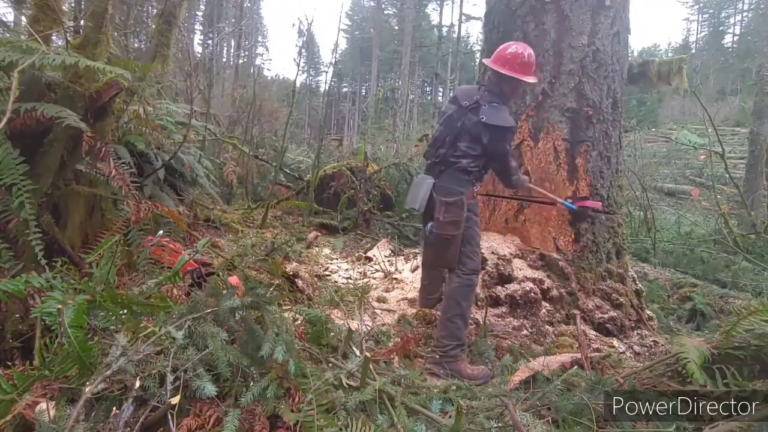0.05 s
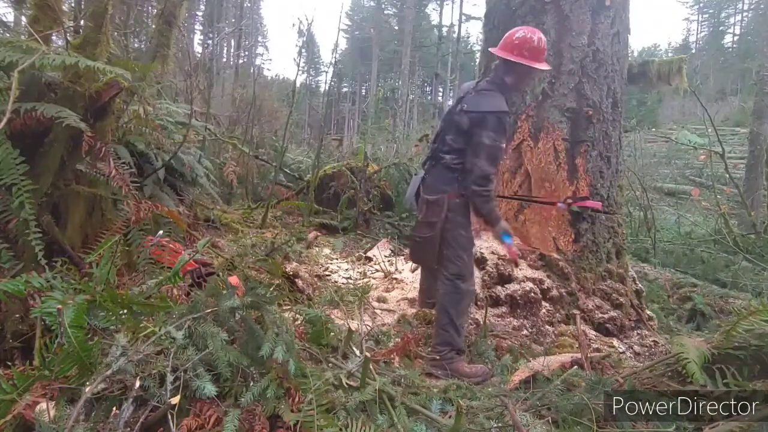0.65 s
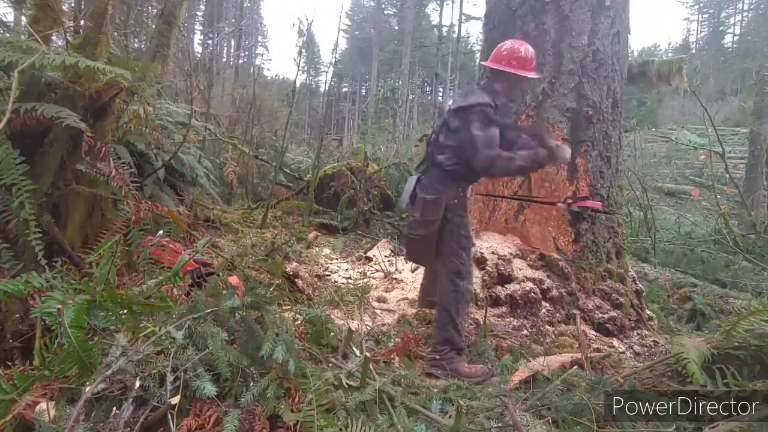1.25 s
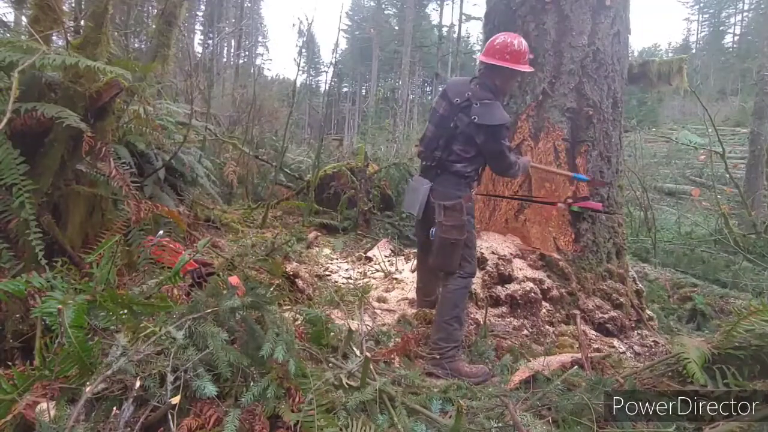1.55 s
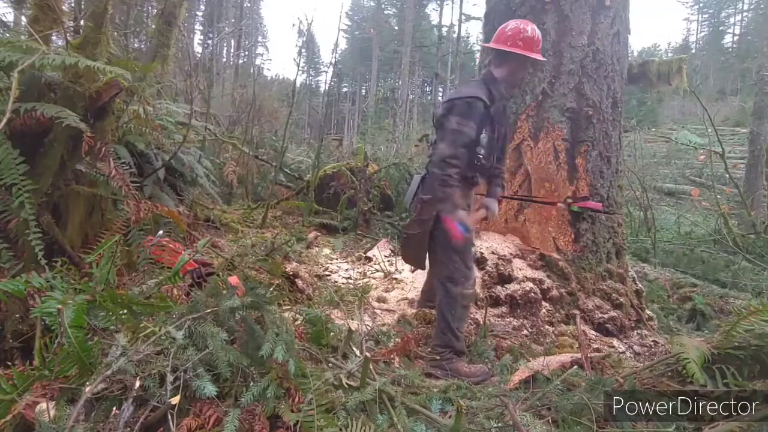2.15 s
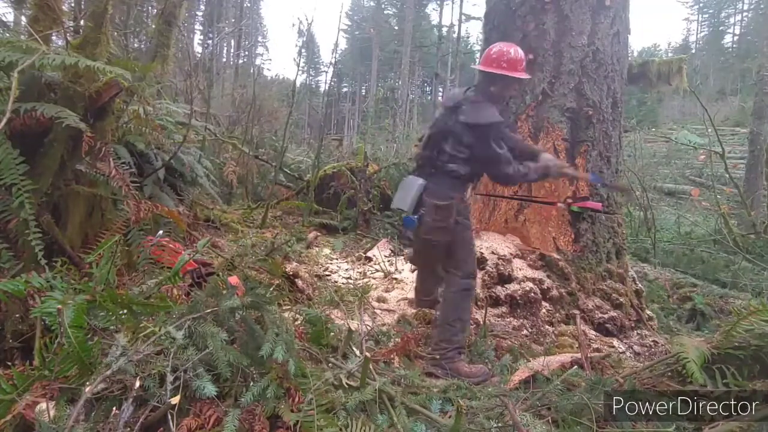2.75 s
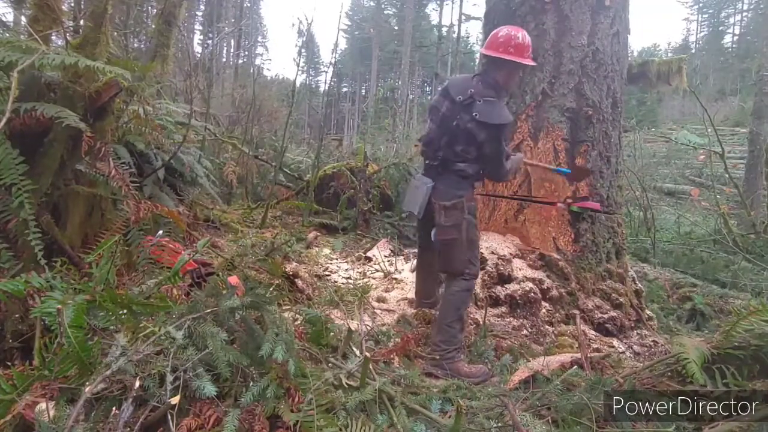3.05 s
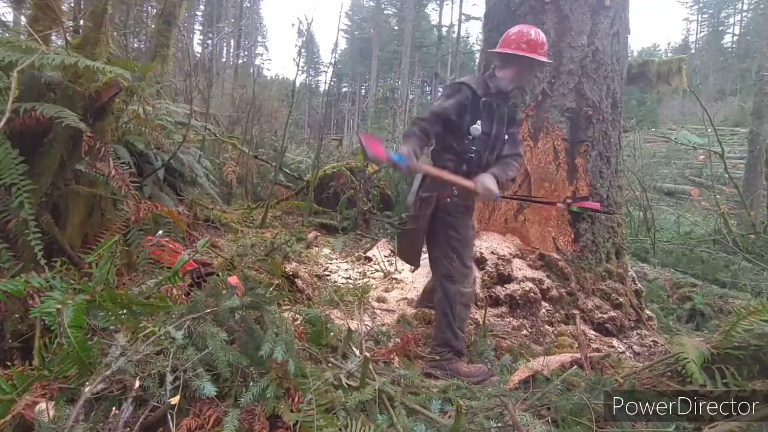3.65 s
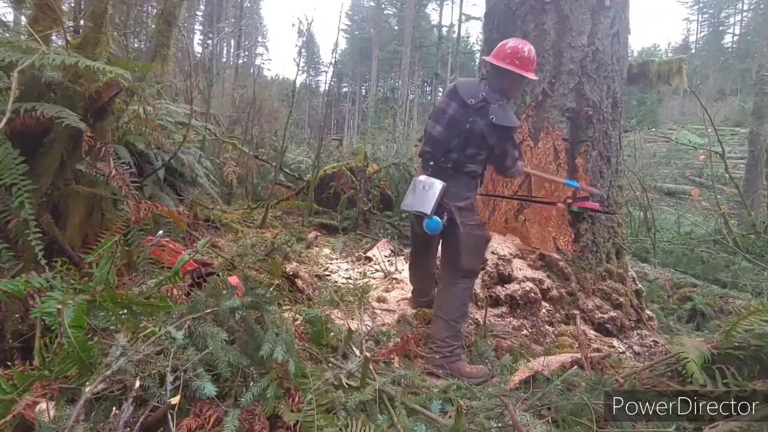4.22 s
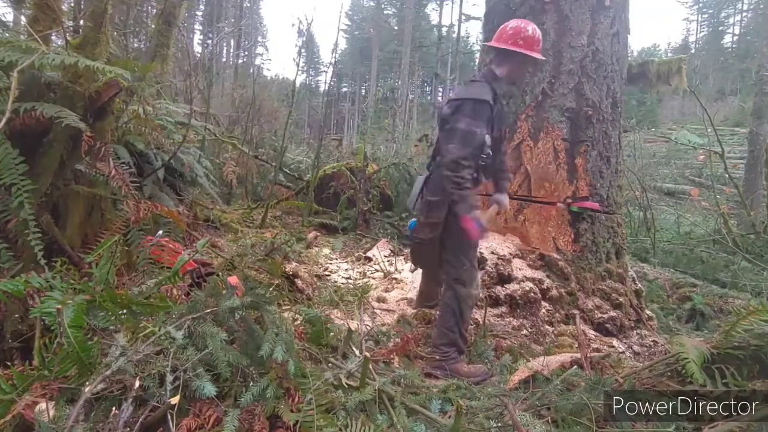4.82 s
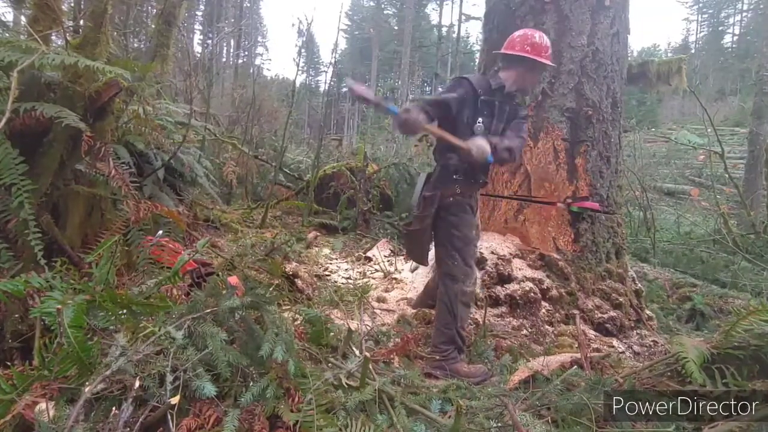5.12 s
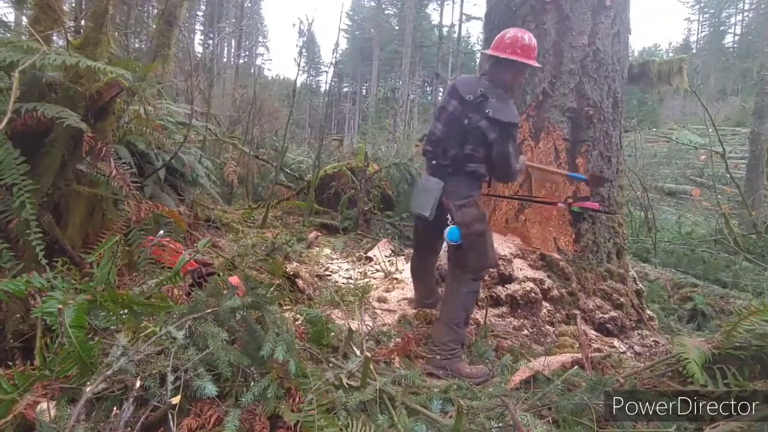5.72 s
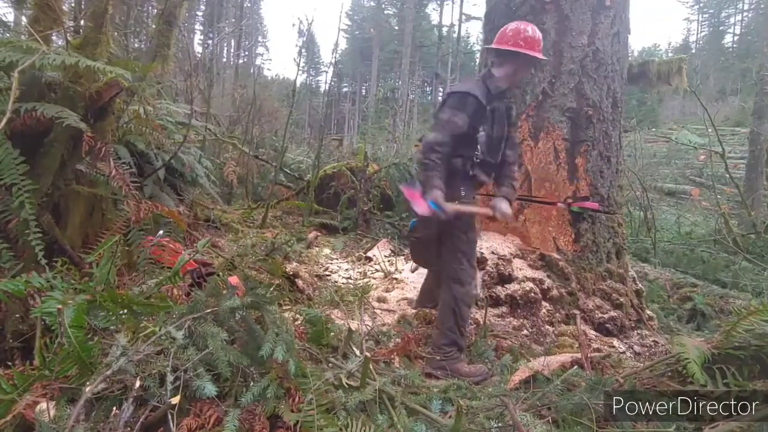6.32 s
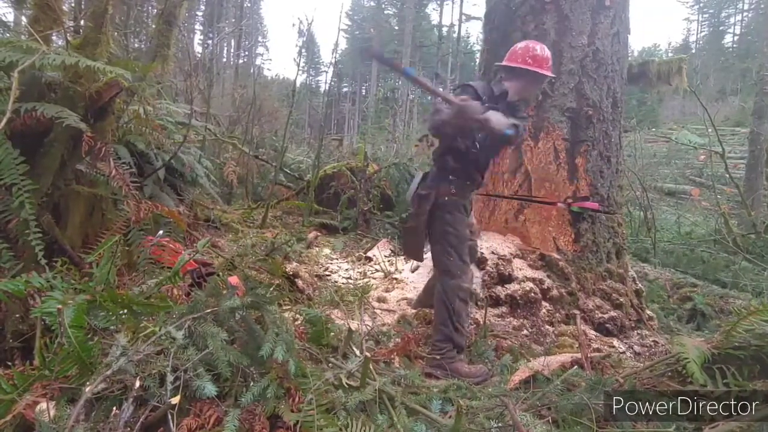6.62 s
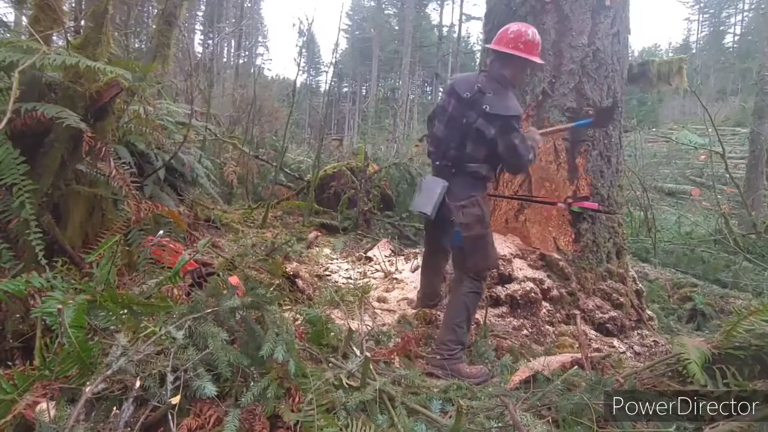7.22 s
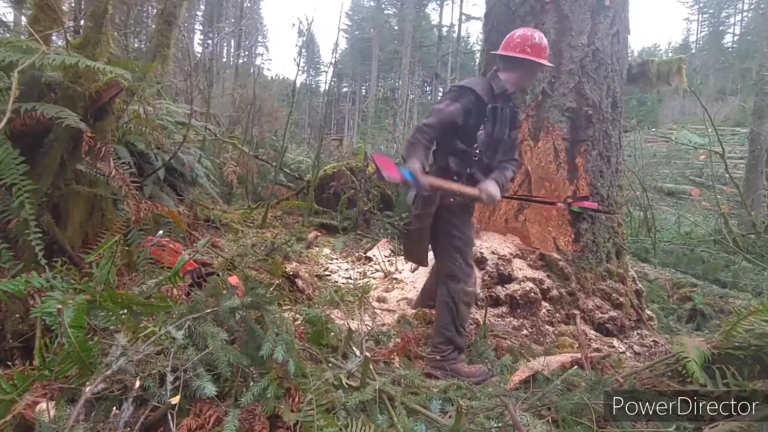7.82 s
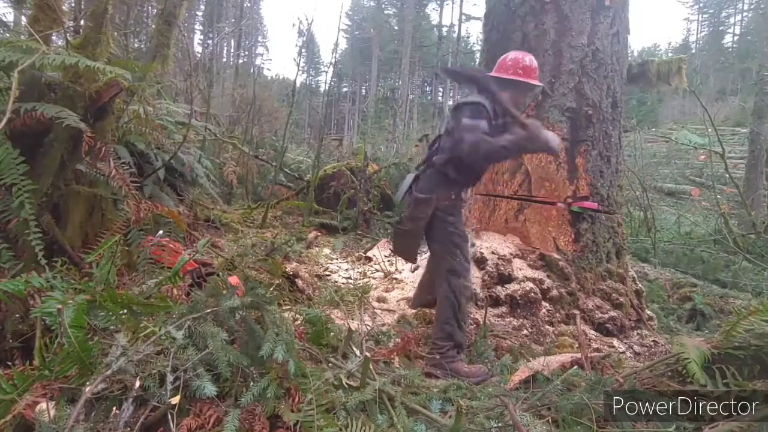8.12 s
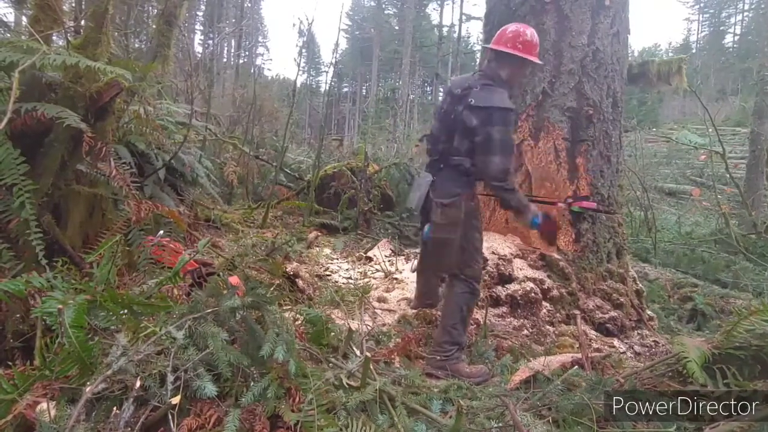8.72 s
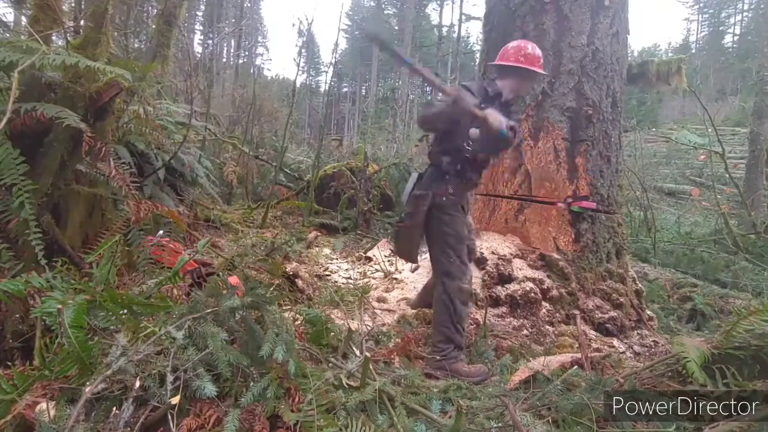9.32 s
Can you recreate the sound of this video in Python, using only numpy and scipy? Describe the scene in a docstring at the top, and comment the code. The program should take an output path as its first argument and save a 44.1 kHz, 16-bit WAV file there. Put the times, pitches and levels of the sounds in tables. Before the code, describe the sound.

An axe drives felling wedges into a big tree in quiet woods, heard from nearby and slightly to the right. A lighter, duller blow lands at 0.2 seconds, followed by six hard ones at about 1.6, 3.0, 4.3, 5.7, 7.0 and 8.4 seconds. Each is a sharp crack with a short ring and a forest echo lasting about a second. The trunk thuds and booms more deeply as the blows go on.

Between strikes, a buckle clinks softly and clothing rustles faintly. A hollow tin on the belt clanks just before the blows, most clearly around 2.9, 4.2, 7.0 and 8.4 seconds. Soft hollow knocks of strained wood follow the strikes. There is a small snap at 1.7 seconds, then loud, sharp wood cracks at 7.4 and 8.6, with smaller ones at 7.8 and 9.1. Underneath lies a very faint hush with tiny twig ticks.

```python
"""An axe drives felling wedges into a big fir: one light blow, then six hard ones. Each jerks the wedge
into the cut and rings wedge and stem; the tighter the wedge, the more the tree booms and the forest echoes.
The hinge wood starts to crack. Belt gear clinks on the backswing and knocks on the downswing; twigs tick
in the hush of the woods. The left microphone port rings near 7 kHz; a limiter ducks on the hard blows,
then lets the echo swell."""
import sys
import numpy as np
from scipy import signal
from scipy.fft import rfft, irfft, next_fast_len
from scipy.io import wavfile
from scipy.ndimage import map_coordinates

SR = 44100
rng = np.random.default_rng(int(sys.argv[2]) if len(sys.argv) > 2 else 0)


def generate_wav(signal):
    """Clip the signal to [-1, 1] and save it as 16-bit WAV at the path in sys.argv[1]."""
    frames = np.transpose(np.atleast_2d(signal))
    scaled = np.clip(frames, -1, 1) * 32767
    pcm = np.round(scaled).astype(np.int16)
    wavfile.write(sys.argv[1], SR, pcm)


N = 413216


def amp(db):
    return 10 ** (np.asarray(db) / 20)


def along(points, hz):
    """Interpolate (f/Hz, value) points over log frequency."""
    f, value = np.transpose(points)
    return np.interp(np.log(hz + 1), np.log(f), value)


def seconds(length_s):
    return np.arange(int(length_s * SR)) / SR


def fade(t, t60_s):
    return np.exp(-np.log(1000) * t / max(t60_s, 1e-4))


def onset(t, rise_s):
    return 1 - np.exp(-t / rise_s)


def fade_after(t, delay_s, t60_s):
    return (t >= delay_s) * fade(np.abs(t - delay_s), t60_s)


def ring(t, hz, t60_s):
    return np.sin(2 * np.pi * hz * t) * fade(t, t60_s)


def wander(t, rate_hz, points):
    """Smooth random curve."""
    return map_coordinates(rng.standard_normal(points), [t * rate_hz], mode="mirror")


def add(track, at_s, sound):
    start = max(round(at_s * SR), 0)
    track[:, start:start + sound.shape[-1]] += sound[..., :N - start]


def unit_rms(x):
    return x / np.sqrt(np.mean(x ** 2) + 1e-20)


def noise(spectrum, size, treble_db=0, bass_db=0):
    """Coloured noise of rms 1, then treble and bass tilts."""
    hz = np.fft.rfftfreq(size, 1 / SR)
    coloured = unit_rms(irfft(rfft(rng.standard_normal(size)) * amp(along(spectrum, hz)), size))
    tilt_db = treble_db * along([(1600, 0), (3000, 0.45), (6000, 1.0)], hz)
    tilt_db += bass_db * along([(400, 0.9), (900, 0.38)], hz)
    return irfft(rfft(coloured) * amp(tilt_db), size)


def resonance(hz, width_hz, size):
    """Narrowband noise of rms 1."""
    offset = (np.fft.rfftfreq(size, 1 / SR) - hz) / width_hz
    return unit_rms(irfft(rfft(rng.standard_normal(size)) / (1 + offset ** 2), size))


# Diffuse field: f/Hz, left-right coherence
COHERENCE = [(25, 0.96), (70, 0.89), (130, 0.19), (290, 1), (640, 0.048), (1400, 0.0027)]

def diffuse(spectrum, size):
    """Noise from all sides, alike at both ports only at low frequencies."""
    angle = np.arccos(np.clip(along(COHERENCE, np.fft.rfftfreq(size, 1 / SR)), -1, 1)) / 2
    mid = rfft(noise(spectrum, size)) * np.cos(angle)
    side = rfft(noise(spectrum, size)) * np.sin(angle)
    return irfft([mid + side, mid - side], size)


# Hush spectrum: f/Hz, level/dB
AIR_SPECTRUM = [(20, -5.5), (55, -4.5), (90, 2.5), (130, -9), (185, -4.5), (260, -6), (700, -14.5),
                (2500, -19.5), (4500, -35.5), (8000, -31), (15000, -35.5)]

def still_air(level_db=-70):
    """The slowly drifting hush of the woods."""
    drift_db = wander(np.arange(N) / SR, rate_hz=3, points=40)
    return amp(level_db + drift_db) * diffuse(AIR_SPECTRUM, next_fast_len(N))[:, :N]


# Low hum: f/Hz, width/Hz, level/dB, t60/s
HUM_BAND = (182, 9, -68, 10)

def hum():
    """A faint, wavering hum dies away."""
    hz, width_hz, db, t60_s = HUM_BAND
    return amp(db) * resonance(hz, width_hz, next_fast_len(N))[:N] * fade(np.arange(N) / SR, t60_s)


# Twig and buckle click spectrum: f/Hz, level/dB
CLICK_SPECTRUM = [(2000, -17.5), (4000, 0), (7000, -5.5), (10000, -0.5), (15000, -9)]

def litter(level_db=-72, spread_db=3, t60_s=0.018, count=45):
    """Needles and twigs tick under shifting boots."""
    out, t = np.zeros((2, N)), seconds(0.05)
    for position, softness in rng.uniform(0, 1, (count, 2)):
        db = level_db - spread_db * np.log(softness + 0.03)
        add(out, position * N / SR, amp(db) * diffuse(CLICK_SPECTRUM, len(t)) * fade(t, t60_s))
    return out


# Echo spectrum: f/Hz, level/dB
ECHO_SPECTRUM = [(40, -1), (280, -1), (500, 3.5), (1000, 1), (1800, -0.5), (2600, 3), (3500, 2), (4700, 1),
                 (7500, 11), (10000, 2.5), (15000, 6)]
# Echo decay: f/Hz, t60/s
ECHO_DECAY = [(50, 0.24), (250, 0.88), (600, 0.83), (1100, 0.87), (1800, 0.93), (2600, 0.83), (3400, 0.72),
              (4700, 0.7), (7200, 0.52), (9500, 0.42), (11500, 0.4), (13000, 0.16)]
# Nearest trunks, left channel: delay/s, level/dB re the whole echo
TRUNK_ECHOES = [(.085, -11), (.109, -19), (.165, -25)]

def outdoors(sound, echo_db, near_db=-1):
    """Sound from the right: direct, off nearby ground and stump, then scattered by many trunks."""
    t = seconds(1.2)
    hz, frame_s, frames = signal.stft(diffuse(ECHO_SPECTRUM, len(t)), SR, nperseg=256)
    decay = amp(-60 * frame_s / along(ECHO_DECAY, hz)[:, None])
    far = signal.istft(frames * decay, SR, nperseg=256)[1][:, :len(t)]
    clumps_db = 3 * wander(t, rate_hz=200, points=400)  # trees stand in clumps
    far *= amp(clumps_db) * onset(t, rise_s=0.028)
    far /= np.linalg.norm(far[0])
    for delay_s, db in TRUNK_ECHOES:
        far[0, round(delay_s * SR)] += amp(db)
    near = diffuse(ECHO_SPECTRUM, len(t)) * np.exp(-(t / 0.019) ** 3)
    paths = amp(echo_db) * far * amp([[0], [-3]]) + amp(near_db) * near / np.linalg.norm(near[0])
    paths[0, 7] += 1  # direct path: later and weaker on the left
    paths[1, 0] += amp(5)
    return signal.fftconvolve(sound[None], paths, axes=1)


# Gear ticks: t/s, level/dB
GEAR_TICKS = [(0.486, -72), (2.624, -70.5), (3.675, -65.5), (4.096, -69), (4.986, -57), (5.467, -59),
              (6.921, -60), (8.119, -62.5), (8.311, -57.5), (9.127, -56.5)]
# Tick spectrum: f/Hz, level/dB
TICK_SPECTRUM = [(1500, -24.5), (5000, -17), (6500, 0), (8200, 6.5), (10000, -13.5), (15000, -12)]

def gear_ticks(t60_s=0.041):
    """Light gear ticks between swings."""
    out, t = np.zeros((2, N)), seconds(0.1)
    for at_s, db in GEAR_TICKS:
        tick = noise(TICK_SPECTRUM, len(t)) * fade(t, t60_s)
        add(out, at_s, amp(db) * outdoors(tick, echo_db=-13.5, near_db=-6.5))
    return out


# Shaken cloth and gear: t/s, length/s, start level/dB, end level/dB
GEAR_SHAKES = [(0.504, 0.021, -63, -64), (1.496, .04, -57.5, -57.5), (2.408, 0.17, -59.5, -61),
               (2.808, 0.13, -55, -47), (3.755, 0.12, -59.5, -55), (4.177, 0.036, -60.5, -49.5),
               (4.265, 0.022, -37, -31), (5.155, 0.17, -56.5, -57), (5.496, 0.24, -61, -60),
               (6.529, .13, -56, -60.5), (6.961, 0.032, -62.5, -44.5), (7.955, .12, -49, -51.5),
               (8.304, 0.079, -61, -47)]

def gear_shakes(touch_rate_hz=90, cloth_db=-11, jingle_db=-14, jingle_hz=9900, pieces=4):
    """A swing rustles cloth; small pieces of gear touch at random and jingle."""
    out, t = np.zeros((2, N)), seconds(0.05)
    for at_s, length_s, start_db, end_db in GEAR_SHAKES:
        size = int(length_s * SR)
        touches = (rng.random(size) < touch_rate_hz / SR) * amp(rng.normal(0, 4, size))
        touches[0] = 1
        swell = amp(np.linspace(start_db, end_db, size))
        contacts = signal.fftconvolve(touches, fade(t, t60_s=0.037))
        cloth = amp(cloth_db) * np.sqrt(np.hanning(len(contacts)))
        envelope = (unit_rms(contacts) + cloth) * np.pad(swell, (0, len(t) - 1), mode="edge")
        rattle = noise(TIN_SPECTRUM, SR // 2, treble_db=-15, bass_db=-10)[:len(envelope)] * envelope
        struck = rng.integers(pieces, size=size)
        rings = [ring(t, jingle_hz * rng.normal(1, 0.065), t60_s=0.049) for _ in range(pieces)]
        jingle = sum(signal.fftconvolve(touches * swell * (struck == k), rings[k]) for k in range(pieces))
        add(out, at_s, outdoors(rattle + amp(jingle_db) * jingle, echo_db=-13, near_db=-6.5))
    return out


# Buckle on hook: t/s, knock level/dB, steel level/dB, glint f/Hz, glint t60/s
BUCKLE_HITS = [(2.441, -41, -47.5, 9400, 0.087), (2.522, -47.5, -52.5, 9750, 0.055),
               (3.779, -49, -56, 9100, 0.058), (3.8535, -45, -61.5, 9200, 0.11),
               (5.176, -49, -55, 10400, 0.067), (5.2542, -44, -66.5, 10300, 0.079),
               (5.278, -45, -58.5, 3166, 0.093), (6.539, -46, -43.5, 9400, 0.071),
               (6.6244, -47.5, -57, 9800, 0.11), (7.9602, -40.5, -41.5, 9350, 0.073),
               (8.0385, -44.5, -49.5, 9250, 0.097)]
# Steel hook: f/Hz, level/dB, t60/s
HOOK_MODES = [(3200, -14, 0.074), (6050, -22, 0.08), (10400, -10.5, 0.082), (11600, -19, 0.041)]

def buckle_clinks(clack_hz=(700, 1050, 1650, 2550, 3700), bounce_span_s=0.011, bounces=2):
    """The buckle clacks, bounces and rings the belt's hook."""
    out, t = np.zeros((2, N)), seconds(0.12)
    for at_s, knock_db, steel_db, glint_hz, glint_t60_s in BUCKLE_HITS:
        hook = sum(amp(db + rng.normal(0, 2.7)) * ring(t, hz, t60_s) for hz, db, t60_s in HOOK_MODES)
        glint = resonance(glint_hz, width_hz=170, size=len(t)) * fade(t, glint_t60_s)
        click = amp(-7) * noise(CLICK_SPECTRUM, len(t)) * fade(t, t60_s=0.029)
        steel = (glint + hook) * onset(t, rise_s=0.003) + click
        clack = sum(amp(-4 - 1.5 * k) * ring(t, hz * rng.normal(1, 0.14), t60_s=0.045)
                    for k, hz in enumerate(clack_hz))
        bump = noise(TIN_SPECTRUM, len(t), treble_db=-15.5, bass_db=-4) * fade(t, t60_s=0.025)
        contacts = np.r_[1.0, np.zeros(len(t))]
        bounce_samples = (rng.uniform(0.2, 1, bounces) * bounce_span_s * SR).astype(int)
        contacts[bounce_samples] += amp(-7) * rng.standard_normal(bounces)
        hit = signal.fftconvolve(amp(steel_db) * steel + amp(knock_db) * (bump + clack), contacts)
        add(out, at_s, outdoors(hit, echo_db=-17, near_db=-8))
    return out


# Belt tin on the hip: t/s, level/dB, treble/dB, note f/Hz, note level/dB
TIN_HITS = [(0.5225, -34, -10, 760, -3), (1.5055, -33, -3, 800, -2), (5.575, -29, 3.5, 1280, -2),
            (8.376, -28, -8, 805, 2), (2.86, -33, 0.5, 840, 0), (2.903, -10.5, -1.5, 1240, 2),
            (4.22, -14, -4, 835, 3), (5.522, -39, -2, 1316, 0), (5.644, -23, 7.5, 601, 0),
            (6.991, -11.5, -2, 743, 0), (7.0235, -13, -0.5, 586, 0), (8.394, -34.5, 14, 776, -6),
            (8.413, -23, 11.5, 550, -3), (8.4235, -9.5, 1.5, 606, 0)]
# Edge contact, then flat: delay/s, level/dB, treble/dB, note level/dB
TIN_LANDING = [(0, 3, -1, -10), (.006, -5.5, -8.5, -0.5)]
# Rattle spectrum: f/Hz, level/dB
TIN_SPECTRUM = [(60, -19), (300, -11), (600, 1.5), (1400, -7), (3000, -2.5), (5000, -12), (9000, -6.5),
                (12000, -14.5), (15000, -36.5)]
# Hollow tin: f/note, level/dB, t60/s
HOLLOW_MODES = [(1, -1, 0.088), (1.16, -9.5, 0.045), (1.869, -7, 0.064), (2.949, -9.5, .05),
                (4.049, -13, 0.054), (4.699, -11, 0.045)]

def tin_knocks(level_db=-9, rattle_t60_s=0.11, hiss_t60_s=0.022):
    """The tin lands with a hiss and a rattle, and rings hollow."""
    out, t = np.zeros((2, N)), seconds(0.2)
    for at_s, db, bright_db, note_hz, hollow_db in TIN_HITS:
        hit = np.zeros(len(t))
        for delay_s, touch_db, treble_db, note_db in TIN_LANDING:
            rattle = noise(TIN_SPECTRUM, len(t), bright_db + treble_db - 5, bass_db=-4.5)
            rattle *= amp(-2.5) * fade_after(t, delay_s, rattle_t60_s)
            hiss = noise(TIN_SPECTRUM, len(t), bright_db + treble_db, bass_db=-8)
            hiss *= amp(-0.5) * fade_after(t, delay_s, hiss_t60_s)
            phase = 2 * np.pi * note_hz * t
            hollow = sum(amp(mode_db) * np.sin(ratio * phase) * fade_after(t, delay_s, t60_s)
                         for ratio, mode_db, t60_s in HOLLOW_MODES)
            hit += amp(touch_db) * (rattle + hiss + amp(note_db + hollow_db) * hollow)
        add(out, at_s, amp(db + level_db) * outdoors(hit, echo_db=-3.5, near_db=-5.5))
    return out


# Wood giving way: t/s, level/dB, f/Hz
WOOD_SLIPS = [(0.244, -28, 620), (1.644, -30, 670), (1.735, -31, 705), (3.078, -27, 433),
              (3.158, -33.5, 790), (3.495, -51.5, 456), (4.464, -27.5, 430), (4.572, -36, 470),
              (5.657, -26, 560), (7.388, -18.5, 436), (8.574, -20, 385)]

def wood_slips(width_hz=90, t60_s=0.078, rise_s=0.0019):
    """Strained wood slips in the cut with a hollow knock."""
    out, t = np.zeros((2, N)), seconds(0.2)
    for at_s, db, hz in WOOD_SLIPS:
        knock = resonance(hz, width_hz, len(t)) * fade(t, t60_s) * onset(t, rise_s)
        add(out, at_s, amp(db) * outdoors(knock, echo_db=-17, near_db=-10))
    return out


# Fibre snaps: t/s, level/dB, treble/dB
FIBRE_SNAPS = [(1.735, -20, -4), (3.792, -31.5, 1.5), (6.744, -38.5, 1), (7.389, 4, -9), (7.82, -9.5, -18),
               (8.569, 1.5, -7.5), (9.0702, -21.5, 2.5)]
# Snap spectrum: f/Hz, level/dB
FIBRE_SPECTRUM = [(40, -4), (200, -2.5), (450, -0.5), (1000, -8), (2000, 2.5), (3500, -0.5), (7000, -5),
                  (11000, -7), (15000, -28.5)]
# Hinge wood: f/Hz, level/dB, t60/s
HINGE_MODES = [(880, -19, .04), (1500, -22.5, 0.031), (2070, -16.5, .025)]

def hinge_cracks(level_db=-5, snap_t60_s=0.0041, splinter_db=-17, splinter_t60_s=0.14):
    """Fibres snap and ring the hinge wood, with a tail of splintering."""
    out, t = np.zeros((2, N)), seconds(0.2)
    envelope = fade(t, snap_t60_s) + amp(splinter_db) * fade(t, splinter_t60_s)
    for at_s, snap_db, treble_db in FIBRE_SNAPS:
        snap = noise(FIBRE_SPECTRUM, len(t), treble_db) * envelope
        wood = sum(amp(db) * ring(t, hz * rng.normal(1, 0.03), t60_s) for hz, db, t60_s in HINGE_MODES)
        add(out, at_s, amp(snap_db + level_db) * outdoors(snap + wood, echo_db=-24.5, near_db=-4.5))
    return out


def slack(blow):
    """Wedge looseness: 1 at first, shrinking with each blow."""
    return 0.67 ** blow


# Wedge-to-tree coupling, by part: tight level/dB, loss at full slack/dB
COUPLING = {"stem": (2.1, 29), "boom": (-13.5, 32), "echo": (1.9, 14)}

def coupling_db(part, looseness):
    """A tight wedge passes more of the blow to the tree."""
    tight_db, loss_db = COUPLING[part]
    return tight_db - loss_db * looseness


# Stem knocks after a blow: delay/s, level/dB, loss at full slack/dB, f/Hz
STEM_THUDS = [(.008, -10, 24, 273), (.014, -20.5, 33.5, 178.5), (0.047, -26.5, 6.5, 300)]

def stem_thuds(t60_s=0.2, rise_s=0.0038, width_hz=36):
    """The heavy stem settles on its hinge with soft, low knocks."""
    out, t = np.zeros((2, N)), seconds(0.2)
    for k, (at_s, *_) in enumerate(AXE_BLOWS):
        for delay_s, db, loss_db, hz in STEM_THUDS:
            thud = resonance(hz * rng.normal(1, 0.07), width_hz, len(t)) * fade(t, t60_s) * onset(t, rise_s)
            add(out, at_s + delay_s, amp(db - loss_db * slack(k)) * thud)
    return out


# Echo of four wedge modes, then the stem's high note: width at full slack/Hz, level/dB, t60/s
ECHO_BANDS = [(80, -30.5, 1.2), (120, -34.5, 1.15), (130, -32.5, 1.2), (120, -37, .92), (70, -41, 1.0)]

def ring_echoes(stem_hz=3750, tight_widening=2.6, flutter_db=3, rise_s=0.034):
    """Trees throw the ringing back and forth: tones in bands that widen as the wedge tightens."""
    out, t = np.zeros((2, N)), seconds(1.2)
    for k, (at_s, blow_db, _, _, *wedge_hz, note_db, upper_db) in enumerate(AXE_BLOWS):
        widening = tight_widening ** (1 - slack(k))
        echo_db = blow_db + coupling_db("echo", slack(k) ** 2)
        for mode, (hz, (width_hz, db, t60_s)) in enumerate(zip((*wedge_hz, stem_hz), ECHO_BANDS)):
            band = amp(-0.5) * np.array([resonance(hz, width_hz * widening, len(t)) for _ in range(2)])
            tone = amp(-2) / widening * resonance(hz, width_hz=9, size=len(t))
            flutter = np.array([wander(t, rate_hz=30, points=100) for _ in range(2)])
            mode_db = echo_db + db + (upper_db if mode else note_db)
            stereo_gain = amp(mode_db + flutter_db * flutter + [[0], [-2]])
            add(out, at_s, stereo_gain * (band + tone) * fade(t, t60_s) * onset(t, rise_s))
    return out


# Boom spectrum: f/Hz, level/dB
BOOM_SPECTRUM = [(20, -19), (33, -12), (48, 1), (70, -2.5), (110, -12), (200, -15.5), (500, -53)]

def trunk_boom(t, t60_s=0.6, rise_s=0.0063):
    """The shaken trunk booms."""
    return diffuse(BOOM_SPECTRUM, len(t)) * fade(t, t60_s) * onset(t, rise_s)


# Wedged stem: f/Hz, level/dB, t60/s
STEM_MODES = [(184, -29, 0.19), (283, -21.5, 0.41), (470, -19.5, 0.018), (603, -20.5, 0.19),
              (847, -24, 0.44), (1210, -22, 0.022), (2120, -19, 0.1), (2667, -12, 0.11)]

def stem_ring(t):
    """The stem rings, slightly detuned on each blow."""
    detune = rng.normal(1, 0.012)
    return sum(amp(db + rng.normal(0, 1)) * ring(t, hz * detune, t60_s) for hz, db, t60_s in STEM_MODES)


# Wedge note and close partner: f/note, level/dB, t60/s
WEDGE_MODES = [(1.001, -17, .17), (1.09, -21.5, 0.076)]
# Wedge modes 2 and 3: level/dB, t60/s
UPPER_MODES = [(-10, 0.021), (-12, .035)]

def wedge_ring(t, note_hz, upper_hz, note_db):
    """The struck wedge rings at its note and two higher modes."""
    note = sum(amp(db) * ring(t, note_hz * ratio, t60_s) for ratio, db, t60_s in WEDGE_MODES)
    upper = sum(amp(db) * ring(t, hz, t60_s) for hz, (db, t60_s) in zip(upper_hz, UPPER_MODES))
    return amp(note_db) * note + upper


# Wedge advance: delay/s, level/dB, extra treble/dB
WEDGE_JERKS = [(0, 3, -3.5), (.003, -2, -3.5), (.009, -16, 6.5), (0.015, -8.5, 8.5)]
# Impact spectrum: f/Hz, level/dB
IMPACT_SPECTRUM = [(40, -23.5), (150, -13), (400, -1.5), (750, 1.5), (1100, 1), (1600, 2.5), (2100, 0.5),
                   (2620, 3), (3200, -4.5), (3700, -5.5), (4600, -3), (5300, -5.5), (7500, -5),
                   (10000, -5.5), (15000, -12)]

def wedge_jerks(t, treble_db, bass_db, t60_s=0.024):
    """The wedge enters the cut in a few cracking jerks."""
    return sum(amp(db) * noise(IMPACT_SPECTRUM, len(t), treble_db + extra_db, bass_db)
               * fade_after(t, delay_s, t60_s) for delay_s, db, extra_db in WEDGE_JERKS)


# Axe steel: f/Hz, width/Hz, level/dB, t60/s (fade raises it to 0.1 ms)
AXE_STEEL = (7127.5, 262.5, -21, -0.0713)

def head_click(t, treble_db):
    """The axe head gives a tiny click."""
    hz, width_hz, db, t60_s = AXE_STEEL
    return amp(db + 0.15 * treble_db) * resonance(hz, width_hz, len(t)) * fade(t, t60_s)


# Axe on wedge: t/s, level/dB, treble/dB, bass/dB, 4 x wedge mode f/Hz, note echo/dB, upper echo/dB
AXE_BLOWS = [(.192, -11.5, -13, 7.5, 1220, 1613, 2080, 4496, 11.5, -4.5),
             (1.582, -2.5, 3, -8, 1304, 2180, 2503, 4700, 1.5, 2),
             (2.955, -4.5, 5.5, -4.5, 1104, 1850, 2450, 4450, 2, 5.5),
             (4.293, -3.5, 3, -4, 913, 1680, 2540, 4140, 1.5, 5.5),
             (5.680, -6, 6, 7, 977, 1830, 2670, 4460, 5, 2.5),
             (7.045, -1.5, 1, -6, 964, 1800, 2660, 4400, 5.5, 7.5),
             (8.435, -2.5, 3.5, -2.5, 909, 1370, 2250, 4510, 1.5, 5.5)]

def axe_blows():
    """Each blow drives the wedge; a dull contact pushes longer, for more note, stem and thump."""
    out, t = np.zeros((2, N)), seconds(1)
    for k, (at_s, db, treble_db, bass_db, note_hz, second_hz, third_hz, *_) in enumerate(AXE_BLOWS):
        echo_db = coupling_db("echo", slack(k) ** 2)
        add(out, at_s, amp(db - 2) * outdoors(wedge_jerks(t, treble_db, bass_db), echo_db))
        stem = amp(coupling_db("stem", slack(k)) - 0.2 * treble_db) * stem_ring(t)
        wedge = wedge_ring(t, note_hz, (second_hz, third_hz), note_db=-4 - 0.41 * treble_db)
        thump = amp(bass_db - 21.5 - 0.9 * treble_db) * ring(t, hz=430, t60_s=0.072)
        add(out, at_s, amp(db) * outdoors(wedge + head_click(t, treble_db), echo_db, near_db=-6))
        add(out, at_s, outdoors(stem, echo_db - 7, near_db=-4.5))
        add(out, at_s, amp(db) * thump)
        add(out, at_s, amp(coupling_db("boom", slack(k))) * trunk_boom(t))
    return out


def scene():
    """Axe and tree, the faller's gear, the quiet woods."""
    tree = axe_blows() + ring_echoes() + hinge_cracks() + stem_thuds() + wood_slips()
    gear = tin_knocks() + buckle_clinks() + gear_shakes() + gear_ticks()
    return tree + gear + litter() + still_air() + hum()


def port(x, response, size=2048):
    """Minimum-phase colouring by one microphone port."""
    cepstrum = irfft(np.log(amp(along(response, np.fft.rfftfreq(size, 1 / SR)))))
    causal = np.r_[cepstrum[0], 2 * cepstrum[1:size // 2]]
    return signal.fftconvolve(x, irfft(np.exp(rfft(causal, size))))[:N]


def limiter(x, release_db_per_s=55, attack_s=0.0086):
    """Gain drops fast above full scale and climbs back steadily."""
    over_db = np.maximum(20 * np.log10(np.abs(x).max(axis=0) + 1e-9), 0)
    climb_db = release_db_per_s * np.arange(N) / SR
    held_db = np.maximum.accumulate(over_db + climb_db) - climb_db
    pole = np.exp(-1 / (attack_s * SR))
    return x * amp(-signal.lfilter([1 - pole], [1, -pole], held_db))


# Left port response: f/Hz, level/dB
LEFT_PORT = [(100, -1.5), (400, -2.5), (900, 3), (2500, 2.5), (4400, 8.5), (5400, 8), (6200, 12),
             (7200, 16.5), (8400, 10), (10000, 9), (15000, -2)]
# Right port response: f/Hz, level/dB
RIGHT_PORT = [(100, -4), (400, -1.5), (900, -1), (2700, -1.5), (4400, 1.5), (6000, -17.5), (8000, -11.5),
              (11000, -8), (13000, -16.5), (15000, -26.5)]
LOWPASS_HZ = 15600

def record(dry):
    """Port colouring, limiter, clipping, low-pass."""
    coloured = np.array([port(dry[0], LEFT_PORT), port(dry[1], RIGHT_PORT)])
    clipped = np.clip(limiter(coloured), -1, 1)
    return signal.sosfilt(signal.ellip(10, 0.1, 80, LOWPASS_HZ, fs=SR, output="sos"), clipped)


dry = scene()
out = record(dry)
generate_wav(out)
```